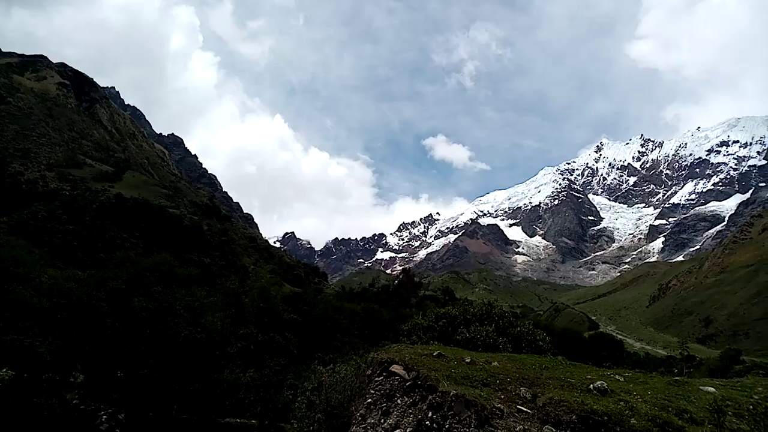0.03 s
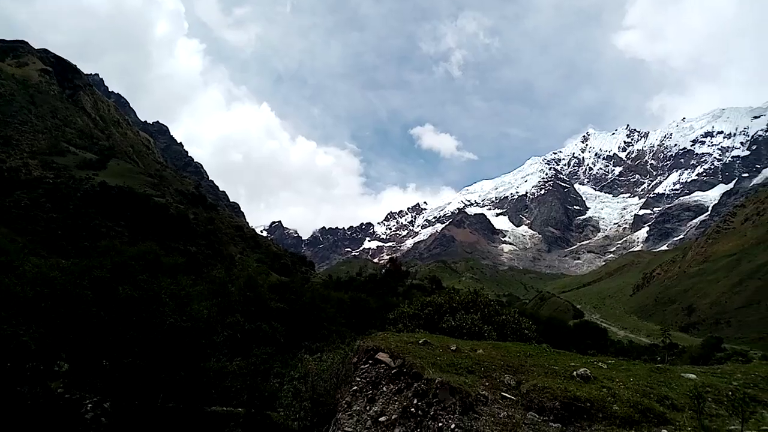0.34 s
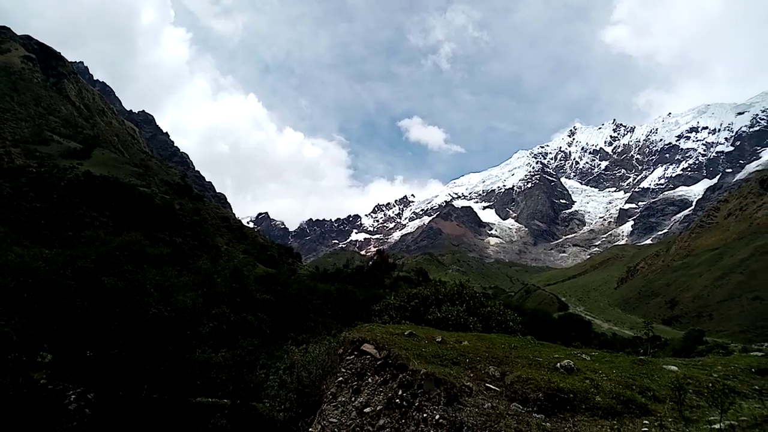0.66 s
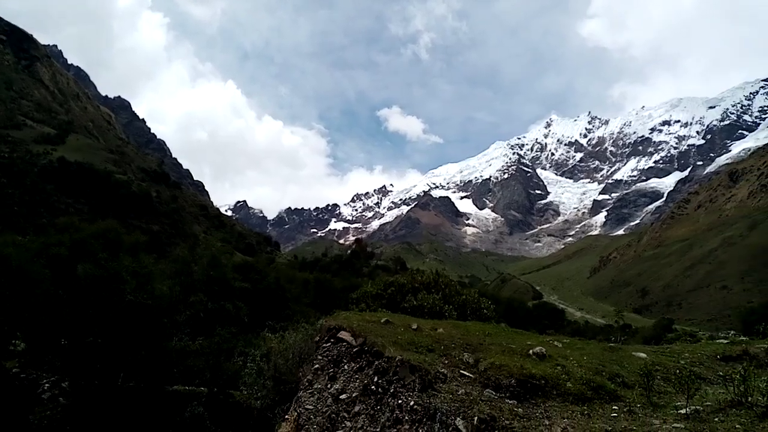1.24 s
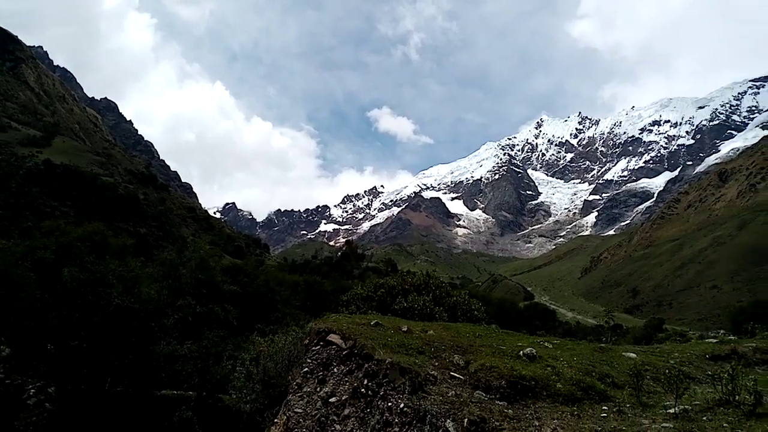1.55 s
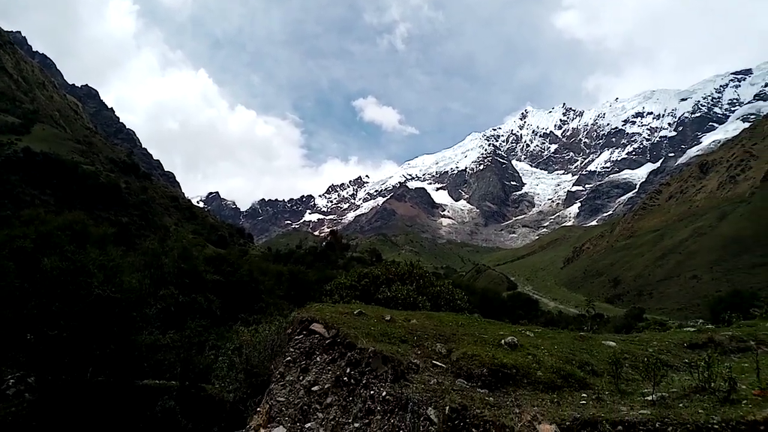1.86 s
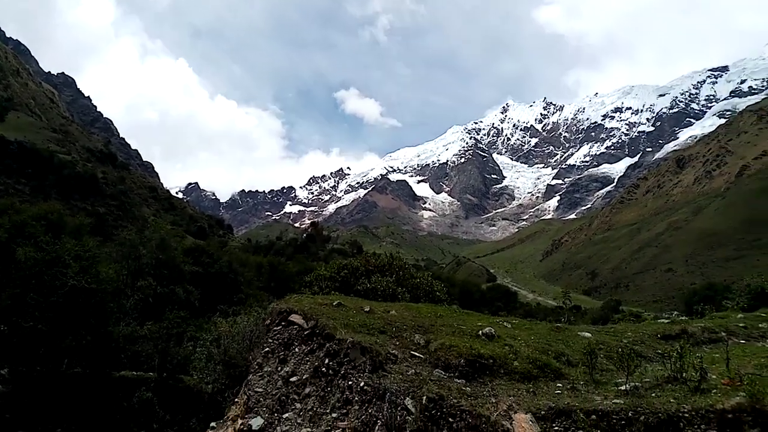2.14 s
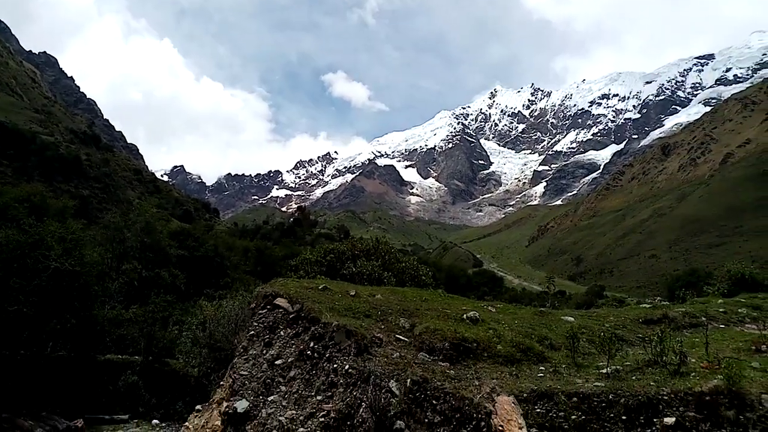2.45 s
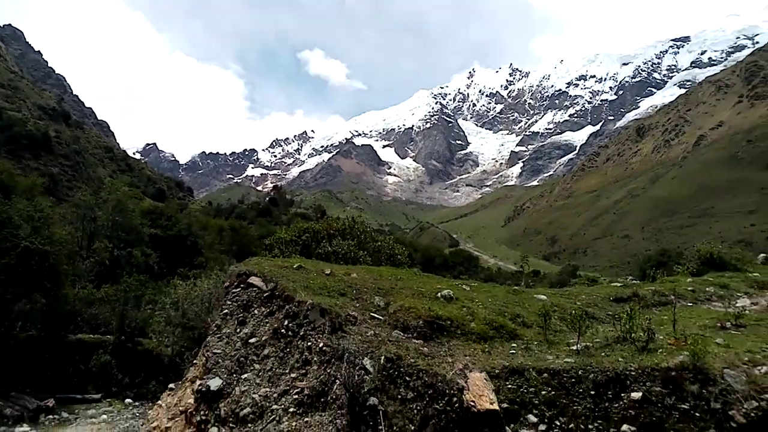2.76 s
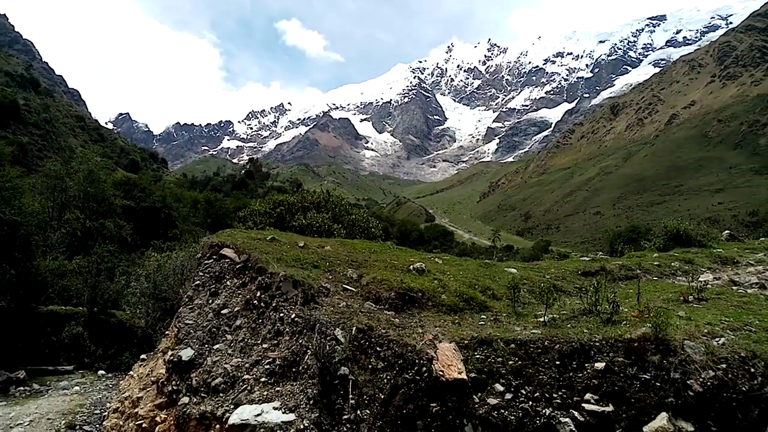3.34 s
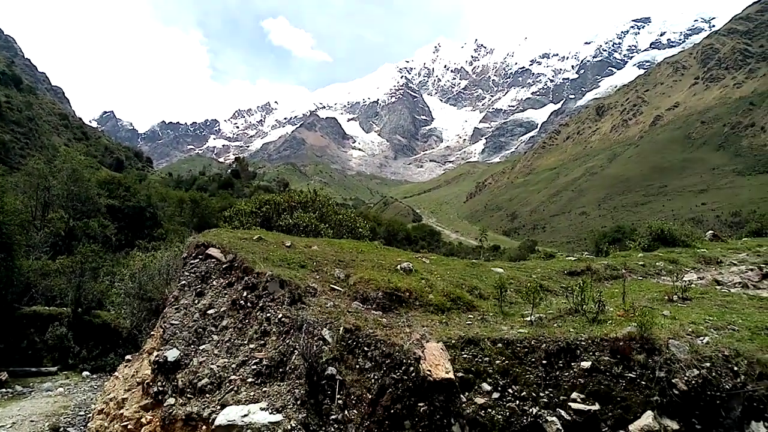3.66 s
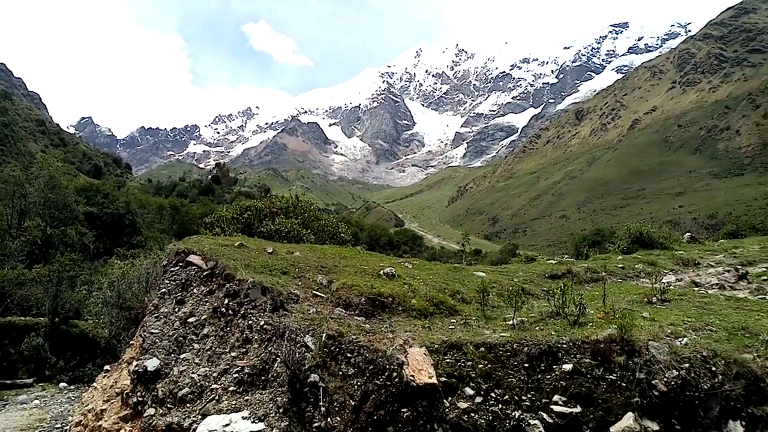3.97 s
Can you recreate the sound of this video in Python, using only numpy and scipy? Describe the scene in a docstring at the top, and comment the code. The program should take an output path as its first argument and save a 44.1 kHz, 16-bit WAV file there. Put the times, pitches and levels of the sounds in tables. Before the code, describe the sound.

A mountain stream rushes steadily over rocks, with light wind rumble and handling bumps.

```python
"""Beside a mountain stream, the water off to the right of a hand-held microphone pair. It rushes over rocks in
a dense hiss of spray, with air bubbles ringing in it and a few larger plops. Right at the microphones, wind
rumbles on each port separately and buffets both in short dull thumps, and handling pops the left port. The
recorder fades in after about a quarter of a second."""
import sys
import numpy as np
from scipy import signal
from scipy.fft import rfft, irfft
from scipy.io import wavfile

SR = 44100
rng = np.random.default_rng(int(sys.argv[2]) if len(sys.argv) > 2 else 0)


def persist_wave(psi):
    """Save psi, clipped to +-1, as 16-bit WAV."""
    counts = np.round(np.clip(psi, -1, 1) * 32767).astype(np.int16)
    wavfile.write(sys.argv[1], SR, np.atleast_2d(counts).T)


N = 176400

# swell of the stream: (time [s], level [dB])
STREAM_LEVEL = [(.3, 2.5), (.6, -.5), (1.1, 0), (1.7, -0.44), (2.0, 0.5), (2.7, 0.5), (2.87, -1),
                (3.05, 0.8), (3.45, 0.2), (3.65, -0.7), (4, 1)]
# tone of the stream at each port: (frequency [Hz], gain [dB])
LEFT_TONE = [(30, -46), (120, -69), (260, -28.5), (450, -35.5), (700, -34), (950, -37.5), (1500, -37),
             (2400, -37.5), (3200, -39), (4200, -40), (5400, -44), (6400, -41.5), (7900, -46),
             (9000, -45.5), (10500, -56.5), (13500, -78), (14800, -60), (16000, -70)]
RIGHT_TONE = [(30, -44), (110, -26), (260, -22), (450, -29), (650, -32), (850, -27), (1250, -31.5),
              (1900, -29.5), (3300, -31), (4600, -29.5), (5300, -27), (5900, -23.5), (6550, -22),
              (7200, -31), (8000, -41.5), (9800, -44), (10800, -46.5), (12200, -57), (13700, -61),
              (14900, -50.5), (16000, -62)]
# part of the stream that both ports hear alike: (frequency [Hz], share of power [0-1])
SHARED_POWER = [(100, 0.75), (650, .85), (1200, 0.72), (2000, 0.34), (3500, 0.38), (5500, 0.12),
                (8000, 0.38), (14000, 0.3)]
# single large bubbles: (time [s], starting pitch [Hz], level [dB])
LARGE_BUBBLES = [(1.49, 860, -42), (2.075, 2100, -34.5), (2.642, 808, -29.5)]
# wind rumble on each port: (time [s], level [dB])
LEFT_WIND_LEVEL = [(.25, -30.5), (.5, -26.5), (.66, -34.5), (.78, -26.5), (.86, -28), (.96, -28),
                   (1.06, -32.5), (1.11, -27), (1.33, -32), (1.9, -33.5), (2.45, -36), (2.69, -33.5),
                   (2.74, -31), (2.85, -31.5), (2.92, -33.5), (3.25, -41), (3.47, -30), (3.75, -38),
                   (3.97, -28.5)]
RIGHT_WIND_LEVEL = [(.25, -39.5), (1.4, -50), (2.3, -54), (2.71, -49), (2.78, -25.5), (2.83, -29.5),
                    (2.865, -26.5), (2.91, -22.5), (2.935, -38), (3.1, -38.5), (3.25, -40.5), (3.36, -40),
                    (3.46, -39), (3.7, -45), (3.81, -30.5), (3.86, -37.5), (3.92, -31.5), (4, -28)]
# tone of a steady breeze, and of the small eddies in gusts: (frequency [Hz], relative level [dB])
RUMBLE_TONE = [(20, -30), (43, -16), (65, -5.5), (108, 2), (160, -1), (220, -5.5), (320, -15.5), (450, -31),
               (900, -38), (3000, -75)]
EDDY_TONE = [(30, -54), (170, -5), (270, 4), (360, -3.5), (500, -14), (800, -28.5), (2500, -61)]
# puffs of eddies on the left port: (time [s], level [dB], half-width [s])
LEFT_PUFFS = [(0.8, -27, 0.012), (0.848, -21, 0.013), (0.886, -28, 0.0058), (2.739, -23, 0.008),
              (2.841, -25, 0.011), (3.96, -32.5, 0.044)]
# handling pops on the left port: (time [s], unfiltered peak [dB])
HANDLING_POPS = [(0.4084, -16), (.4136, -9.5), (0.4367, -18), (0.718, -9.5), (0.7476, -18), (1.0405, -11.5),
                 (1.0856, -5), (1.089, -10)]
# dull wind buffets on the ports: (time [s], unfiltered peak [dB], half-width [s], port [0 left, 1 right])
WIND_BUFFETS = [(1.087, -9, 0.0039, 0), (1.097, -16, 0.0028, 0), (1.1168, -34, 0.0026, 0),
                (2.9093, -21, 0.0025, 1), (3.014, -10, 0.0019, 1)]

LEFT_LAG_S = 0.00135  # the water's sound reaches the left port later
CHURN_DB, CHURN_HZ, SURGE_DB, SURGE_HZ = 1.22, 16.5, 0.16, 4  # flicker per band; swell of the whole
BUBBLES_PER_S, BUBBLE_CYCLES, BUBBLE_SPREAD_DB, BUBBLE_DB = 900, 38, 4.5, -18
BUBBLE_LOW_HZ, BUBBLE_HIGH_HZ = 570, 5280
PLOP_T60_S, PLOP_ATTACK_S, PLOP_LEFT_DB, PLOP_RISE_PER_S = 0.11, 0.0054, -6, 1.2
EDDY_DB, GUST_DB, EDDY_GROWTH = -27, -21.5, 1.94  # eddy level in a gust of GUST_DB; dB per dB of wind
LUMP_DB, LUMP_HZ = 1.0, 35
POP_DECAY_S, PORT_LOW_HZ, HANDLING_TOP_HZ = 0.0011, 85, 3780
START_S, FADE_S, FADE_POWER = 0.23, 0.33, 0.98
SUBSONIC_HZ, CUTOFF_HZ = 36, 15900


def stream():
    """Spray and bubbles reach the right port first; scattered sound differs at each port."""
    water = spray() + from_db(BUBBLE_DB) * bubbles()
    share = per_bin(SHARED_POWER)
    ports = []
    for lag, tone in ((LEFT_LAG_S, LEFT_TONE), (0, RIGHT_TONE)):
        direct = shaped(np.roll(water, round(lag * SR)), np.sqrt(share))
        scattered = shaped(spray(), np.sqrt(1 - share))
        ports.append(shaped(direct + scattered, from_db(per_bin(tone))))
    return np.array(ports) * from_db(in_time(STREAM_LEVEL) + SURGE_DB * drift(SURGE_HZ))


def spray():
    """Water breaking over rocks: a white rush whose bands churn, each on its own."""
    white = rfft(rng.standard_normal(N))
    edges = np.r_[0, np.geomspace(300, 14000, 22) * N / SR, len(white)].astype(int)
    bins, rush = np.arange(len(white)), np.zeros(N)
    for low, high in zip(edges, edges[1:]):
        band = irfft(white * ((bins >= low) & (bins < high)), N)
        rush += band * from_db(CHURN_DB * drift(CHURN_HZ))
    return rms_one(rush)


def bubbles(count=3600):
    """Air pockets of many sizes ring briefly, rising a little in pitch."""
    out = np.zeros(N + SR)
    draws = rng.random((count, 4))
    gaps = -np.log(1 - draws[:, 0]) / BUBBLES_PER_S
    starts = (np.cumsum(gaps) * SR % N).astype(int)
    for start, (_, pitch, strength, sign) in zip(starts, draws):
        hz = BUBBLE_LOW_HZ * (BUBBLE_HIGH_HZ / BUBBLE_LOW_HZ) ** pitch
        life = np.linspace(0, 1, int(SR * BUBBLE_CYCLES / hz))
        db = BUBBLE_SPREAD_DB * min(-np.log(1 - strength), 5) - 60 * life
        phase = 2 * np.pi * BUBBLE_CYCLES * life * (1 + 0.063 * life)
        out[start:start + len(life)] += np.sign(sign - .5) * np.sqrt(hz) * from_db(db) * np.sin(phase)
    return rms_one(out[:N])


def plops():
    """Large air pockets ring clear of the rush, off to the right, rising in pitch."""
    t, right = np.arange(N) / SR, np.zeros(N)
    for start, hz, db in LARGE_BUBBLES:
        age = np.clip(t - start, 0, 1)
        envelope = from_db(db - 60 * age / PLOP_T60_S) * (1 - np.exp(-age / PLOP_ATTACK_S))
        right += envelope * np.sin(2 * np.pi * hz * age * (1 + PLOP_RISE_PER_S * age / 2))
    left = from_db(PLOP_LEFT_DB) * np.roll(right, round(LEFT_LAG_S * SR))
    return np.array([left, right])


def wind(levels, puffs=()):
    """Lumpy rumble on one port; small eddies come in puffs and outgrow the rumble as a gust builds."""
    db = in_time(levels) + LUMP_DB * drift(LUMP_HZ)
    rumble = noise(from_db(per_bin(RUMBLE_TONE)))
    eddies = noise(from_db(per_bin(EDDY_TONE)))
    gusting = from_db(EDDY_DB + EDDY_GROWTH * (db - GUST_DB))
    puffing = sum(pulse(*puff) for puff in puffs)
    return from_db(db) * rumble + (gusting + puffing) * eddies


def handling():
    """Sudden handling steps that leak away, and soft pushes of wind buffets, through the bass cut of the ports."""
    t, pressure = np.arange(N) / SR, np.zeros((2, N))
    for start, db in HANDLING_POPS:
        leak = np.exp(-np.minimum(abs(t - start) / POP_DECAY_S, 20))
        pressure[0] += from_db(db) * (t >= start) * leak
    for centre, db, half_width, port in WIND_BUFFETS:
        pressure[int(port)] += pulse(centre, db, half_width)
    dulled = signal.sosfilt(signal.butter(2, HANDLING_TOP_HZ, fs=SR, output="sos"), pressure)
    return signal.sosfilt(signal.butter(2, PORT_LOW_HZ, "high", fs=SR, output="sos"), dulled)


def from_db(db):
    """Decibels to gain."""
    return 10 ** (np.asarray(db) / 20)


def rms_one(x):
    """Scale to rms 1."""
    return x / np.sqrt(np.mean(x ** 2) + 1e-20)


def in_time(rows):
    """A control curve at every sample."""
    return np.interp(np.arange(N) / SR, *np.transpose(rows))


def per_bin(points):
    """A table over log frequency at every spectral bin."""
    hz, value = np.transpose(points)
    bin_hz = np.maximum(np.arange(N // 2 + 1) * SR / N, 1)
    return np.interp(np.log(bin_hz), np.log(hz), value)


def shaped(x, gain):
    """Filter by a gain for each bin."""
    return irfft(rfft(x) * gain, N)


def noise(gain):
    """Noise of rms 1, coloured by a gain for each bin."""
    return rms_one(shaped(rng.standard_normal(N), gain))


def drift(corner_hz):
    """Random wander of rms 1, mostly slower than corner_hz."""
    hz = np.arange(N // 2 + 1) * SR / N
    return noise(1 / (1 + (hz / corner_hz) ** 2))


def pulse(centre, db, half_width):
    """A bell-shaped swell in time."""
    offset = (np.arange(N) / SR - centre) / half_width
    return from_db(db) * np.exp(-np.minimum(offset ** 2, 20))


def scene():
    """The stream off to the right; wind and handling at the microphones themselves."""
    water = stream() + plops()
    buffeting = np.array([wind(LEFT_WIND_LEVEL, LEFT_PUFFS), wind(RIGHT_WIND_LEVEL)])
    return water + buffeting + handling()


def record(dry):
    """The recorder fades in, and cuts the deepest bass and the top."""
    fade = np.clip((np.arange(N) / SR - START_S) / FADE_S, 0, 1) ** FADE_POWER
    bass_cut = signal.butter(2, SUBSONIC_HZ, "high", fs=SR, output="sos")
    top_cut = signal.cheby2(18, 70, CUTOFF_HZ, fs=SR, output="sos")
    return signal.sosfilt(top_cut, signal.sosfilt(bass_cut, dry * fade + 1e-18))


dry = scene()
out = record(dry)
persist_wave(out)
```